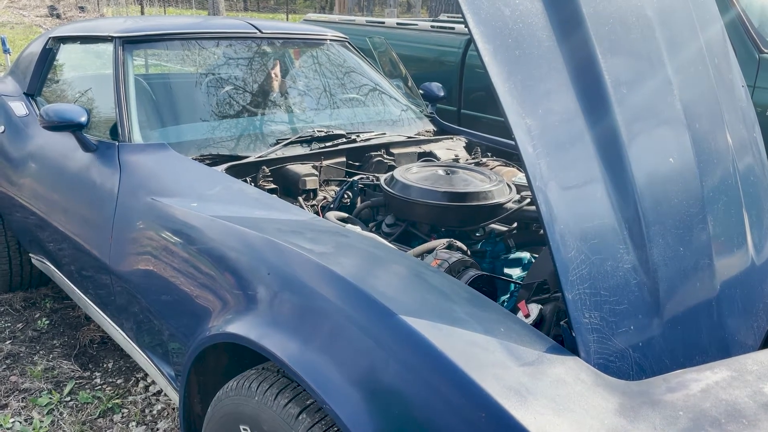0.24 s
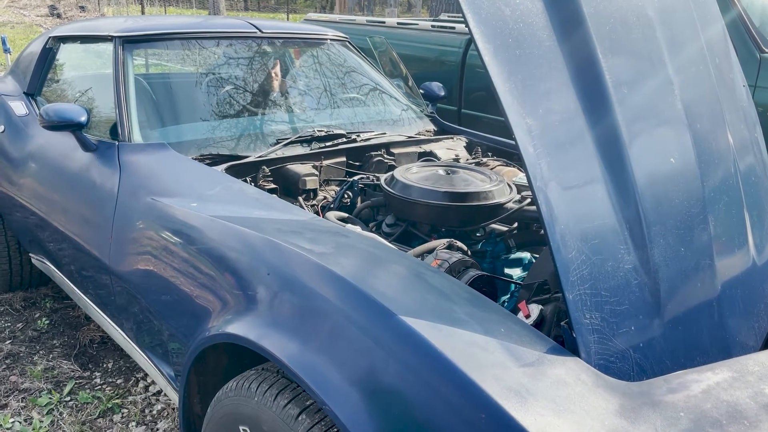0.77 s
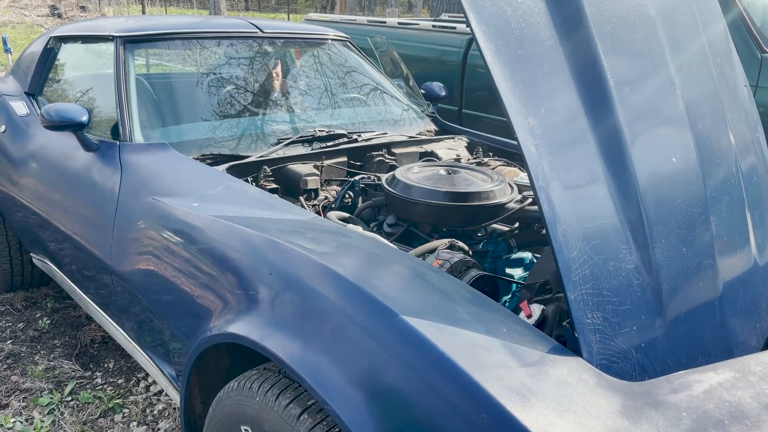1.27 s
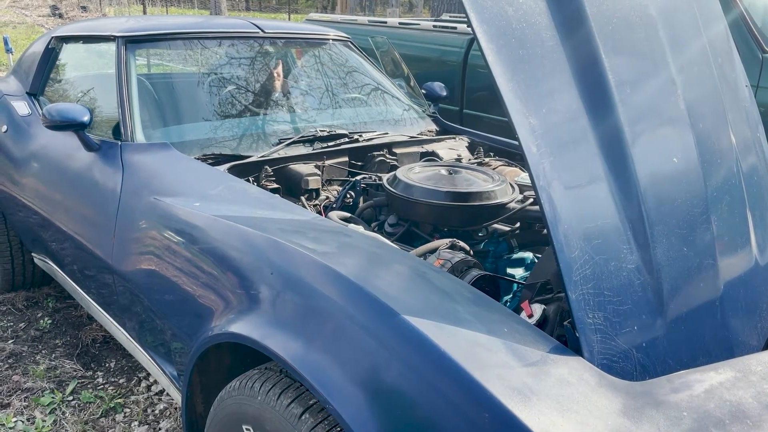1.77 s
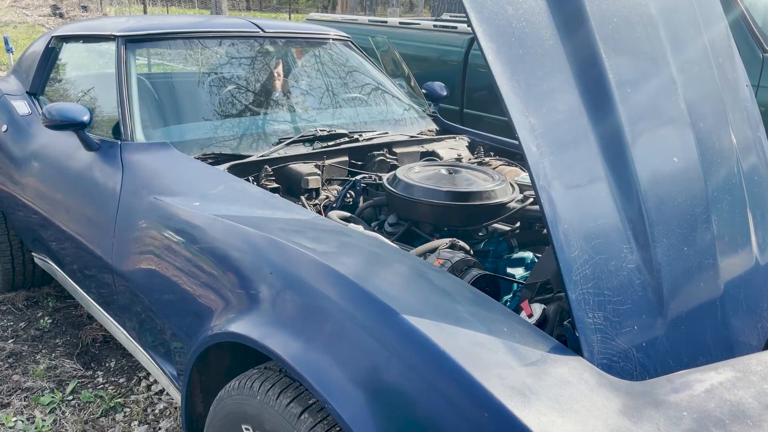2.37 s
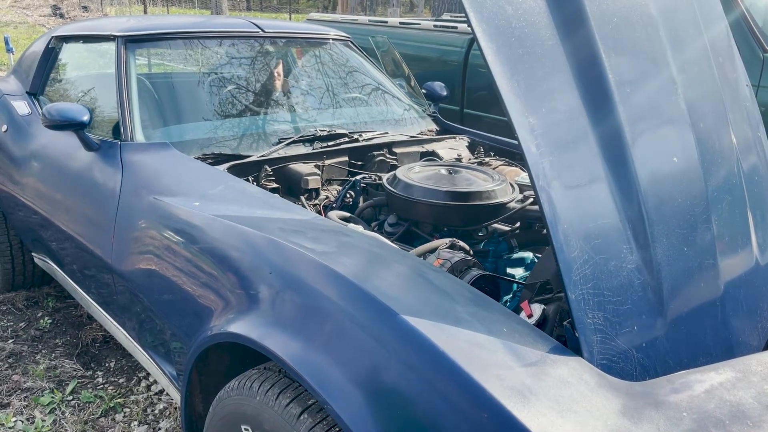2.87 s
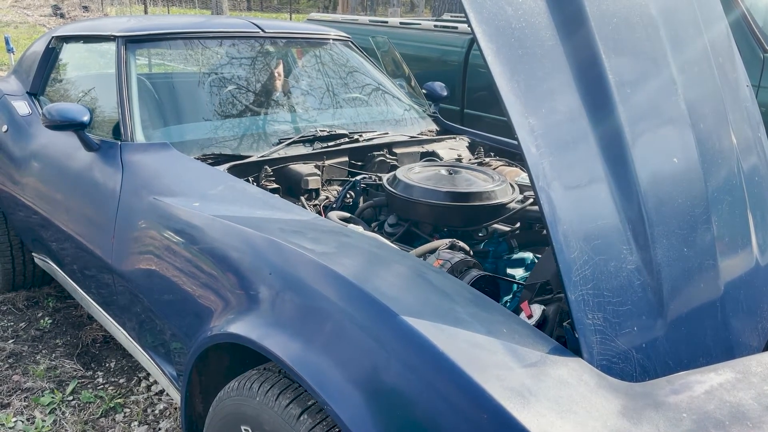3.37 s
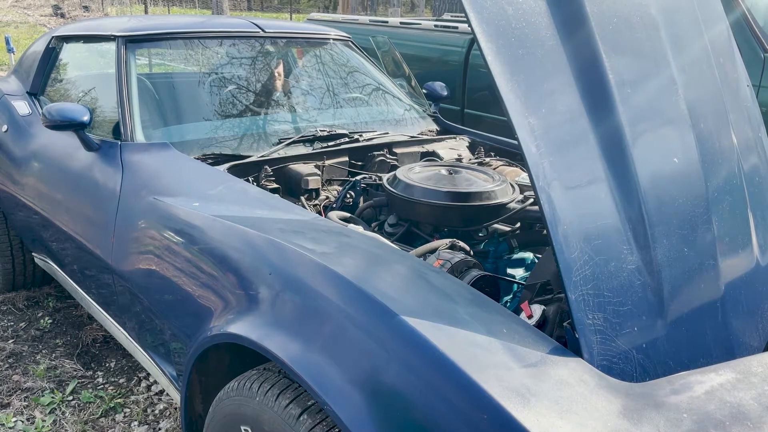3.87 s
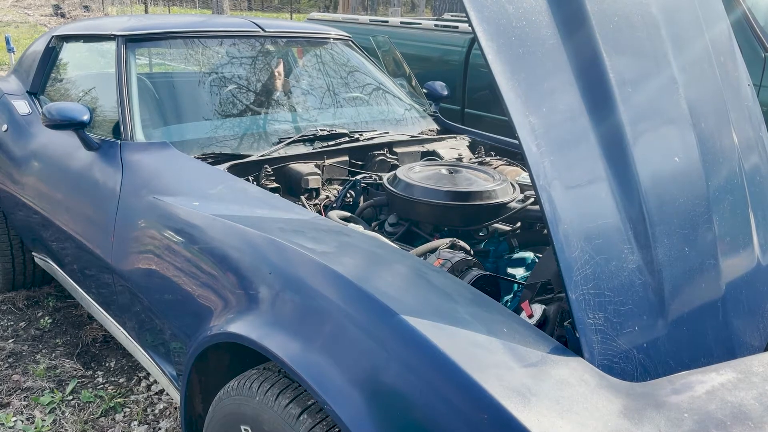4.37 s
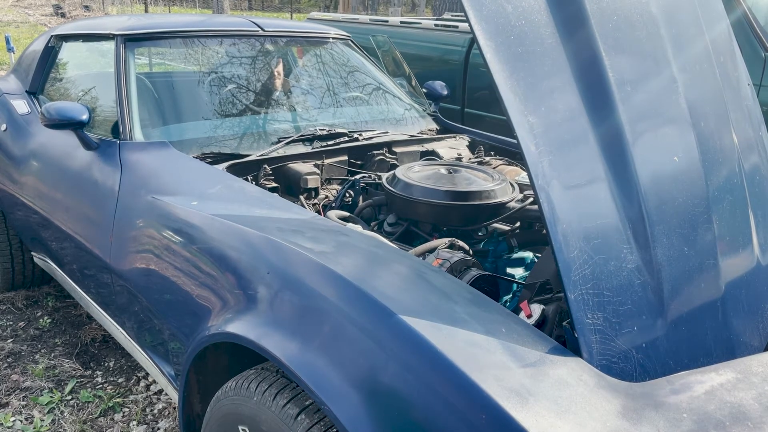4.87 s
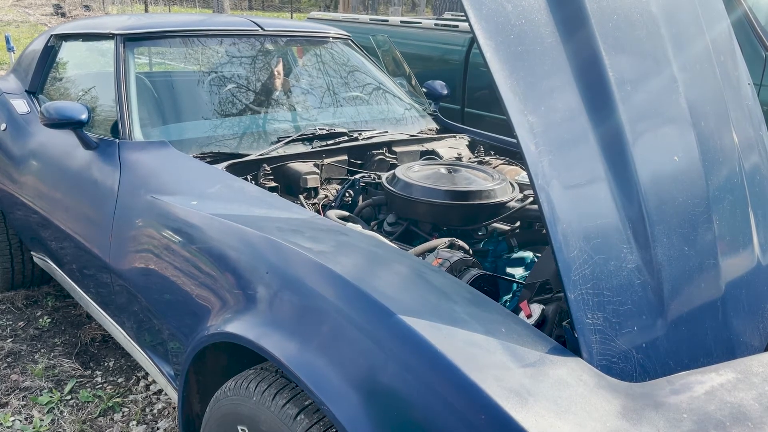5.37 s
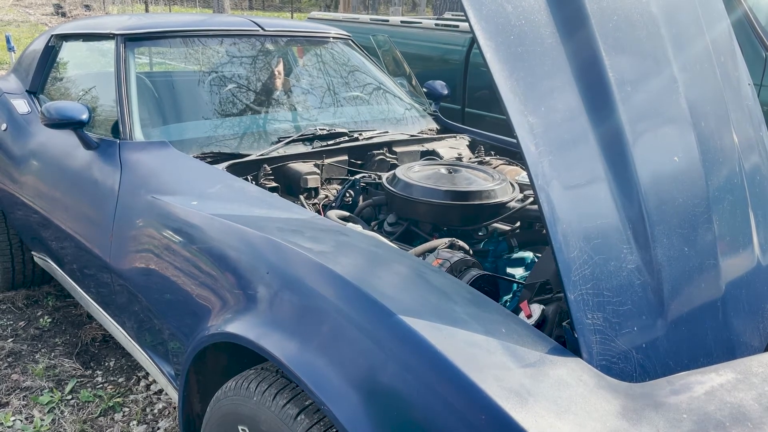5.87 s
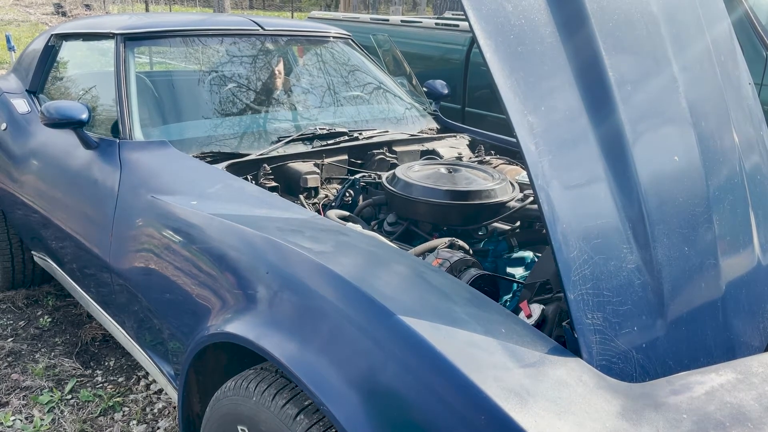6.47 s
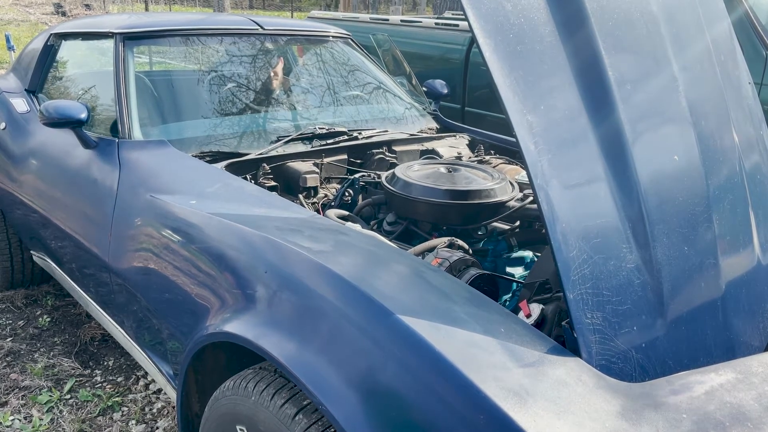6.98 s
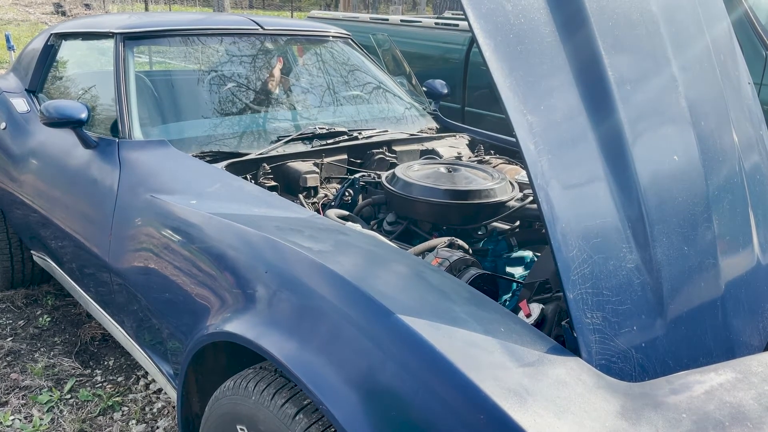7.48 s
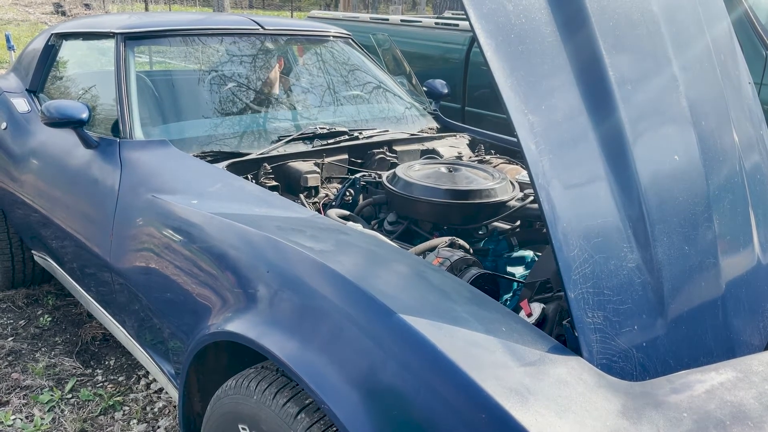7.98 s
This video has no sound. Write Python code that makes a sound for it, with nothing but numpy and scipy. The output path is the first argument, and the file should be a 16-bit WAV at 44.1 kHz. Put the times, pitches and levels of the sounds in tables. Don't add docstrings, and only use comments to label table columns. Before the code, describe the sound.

A large petrol V8 runs about two metres away, hood open, outdoors, heard in stereo on a phone. It starts at a quick idle, sags with uneven misfires, recovers briefly, then slows until it nearly stalls. A rush of intake air follows, then two throttle blips and a steady fast idle. Valve gear knocks and ticks, faint chirps and airy hiss run throughout.

```python
import sys
import numpy as np
from scipy import signal
from scipy.fft import rfft, irfft, next_fast_len
from scipy.io import wavfile
from scipy.ndimage import uniform_filter1d

SR = 44100
rng = np.random.default_rng(int(sys.argv[2]) if len(sys.argv) > 2 else 0)


def convert_level_to_amplitude(level_db):
    exponent = np.asarray(level_db, float) / 20
    return 10 ** exponent


def master(y):
    cut = np.clip(np.atleast_2d(y).T, -1, 1)
    pcm = np.round(cut * 32767)
    wavfile.write(sys.argv[1], SR, pcm.astype(np.int16))


N = 363384
TIME = np.arange(N) / SR
HZ = np.maximum(np.fft.rfftfreq(next_fast_len(N, True), 1 / SR), 1)
SIZE = 2 * len(HZ) - 2
REF_HZ = 64

# (time [s], firing rate [Hz])
SPEED = [(0.0, 65.03), (1.34, 46.83), (2.28, 34.38), (2.79, 49.04), (3.17, 50.98), (4.14, 43.78),
         (4.61, 37.78), (5.12, 33.7), (5.62, 29.72), (5.95, 30.75), (6.28, 26.37), (6.46, 35.13),
         (6.75, 83.5), (7.04, 65.5), (7.44, 105), (7.52, 104), (7.75, 79.5), (8.24, 79.4)]


def unit(x):
    return x / np.sqrt(np.mean(x ** 2))


def curves(rows):
    s, *columns = np.transpose(rows)
    return [np.interp(TIME, s, c) for c in columns]


def walk(rate):
    hold = int(SR / rate)
    steps = np.repeat(rng.standard_normal(N // hold + 1), hold)
    return 0.957 * uniform_filter1d(uniform_filter1d(steps, hold), hold)[:N]


def coloured(gain):
    real, imag = rng.standard_normal((2, 2, len(HZ)))
    return unit(irfft((real + 1j * imag) * gain, SIZE)[:, :N])


def noise(spectrum):
    hz, db = np.transpose(spectrum)
    return coloured(convert_level_to_amplitude(np.interp(np.log(HZ), np.log(hz), db)))


def response(modes):
    total = 0
    for k, (f, width, db) in enumerate(modes):
        total = total + (-1) ** k * convert_level_to_amplitude(db) * 1j * HZ * width / (f * f - HZ ** 2 + 1j * HZ * width)
    return total


def rattle(modes):
    return coloured(response(modes))


def paths(direct, scattered, share):
    share = np.clip(share, 0, 1)
    return np.array([np.sqrt(1 - share) * direct, np.sqrt(share) * scattered])


def bumps(events, rise_s, fall_s):
    s, db = np.transpose(events)
    out = np.zeros(N)
    for t, g in zip(s, convert_level_to_amplitude(db)):
        near = slice(max(int((t - 4 * rise_s) * SR), 0), int((t + 6 * fall_s) * SR))
        d = TIME[near] - t
        rise = np.exp(-(d / rise_s) ** 2)
        fall = np.exp(-np.maximum(d, 0) / fall_s)
        out[near] += g * np.where(d < 0, rise, fall)
    return out


def knocks(events, modes, rise_s, fall_s, db):
    return paths(*rattle(modes), share=0.2) * bumps(events, rise_s, fall_s) * convert_level_to_amplitude(db)


def gaps(rows):
    coarse = TIME[::32]
    total = sum(db * np.exp(-((coarse - s) / (0.58 * length)) ** 4) for s, length, db in rows)
    return np.interp(TIME, coarse, total)


def speed():
    full_pull_per_s, slew_s, lead_s = .78, .08, .03
    hz = curves(SPEED)[0]
    pull = uniform_filter1d(np.gradient(np.log(hz)) * SR, int(slew_s * SR))
    pull = np.interp(TIME + lead_s, TIME, pull)
    return hz, np.cumsum(hz) / SR, np.tanh((pull / full_pull_per_s) ** 3)


def law_db(base_db, doubling_db, open_db, overrun_db):
    hz, _, throttle = speed()
    by_speed = base_db + doubling_db * np.log2(hz / REF_HZ)
    return by_speed + open_db * np.maximum(throttle, 0) + overrun_db * np.maximum(-throttle, 0)


def cam(pattern, count, scatter_db, slow_db):
    hz, fired, _ = speed()
    share, db = np.transpose(pattern)
    turns = np.arange(count)[:, None] + share
    s = np.interp(turns.ravel() * 8, fired, TIME)
    chance = np.clip(rng.standard_normal((count, len(db))), -2, 1)
    slowness = np.log2(REF_HZ / np.interp(s, TIME, hz))
    return list(zip(s, (db + scatter_db * chance).ravel() + slow_db * slowness))


def firings(jitter=0.013):
    cylinder_bias = [-.5, -.5, 0, 0, 0, 1, 1, -1]
    scatter_db, slow_power, overrun_skip_db = 1.6, 1.1, -7
    hz, turns, throttle = speed()
    rough_db = scatter_db * (REF_HZ / hz) ** slow_power * (1 - np.maximum(throttle, 0) / 2)
    count = np.arange(int(turns[-1]))
    chance = np.clip(rng.standard_normal((1000, 2))[count], -2, 1)
    late = jitter * np.interp(count, turns, rough_db) * chance[:, 0]
    at = np.searchsorted(turns, count + late)
    strength_db = rough_db[at] * (np.array(cylinder_bias)[count % 8] / 2 + chance[:, 1])
    skip_db = overrun_skip_db * (count % 2) * np.maximum(-throttle[at], 0) ** 2
    pulses, even = np.zeros(N), np.zeros(N)
    pulses[at] = convert_level_to_amplitude(strength_db + skip_db)
    even[at] = 1
    return pulses, even, turns % 1


def misfire_db():
    # (time [s], length [s], change [dB])
    failures = [(1.091, .021, -5), (1.134, 0.012, -11), (1.19, 0.02, -5), (1.34, 0.012, -17),
                (1.469, 0.012, -24), (1.61, 0.023, -17), (1.785, 0.043, -9.5), (1.841, .036, -5.5),
                (2.038, 0.097, -5.5), (2.226, 0.15, -6.5), (2.279, 0.052, -4), (2.343, 0.052, -5.5),
                (2.8, .02, 4), (3.12, 0.028, 2), (3.44, 0.03, 4.5), (3.87, 0.029, -4.5), (3.955, 0.021, 0),
                (4.61, 0.022, -5), (5.047, 0.049, -4.5), (5.211, 0.13, -3.5), (5.339, 0.05, -3.5),
                (5.431, 0.023, 0), (5.521, 0.034, -4), (5.682, .087, -5.5), (5.97, .056, -2),
                (6.085, 0.089, -7), (6.418, 0.08, -6), (6.877, 0.049, -3.5), (7.128, .028, -3),
                (7.474, .028, -4)]
    lame_from_s, lame_width_turns = .6, 0.13
    lame = cam([(0.854, -6)], count=33, scatter_db=6.5, slow_db=-1.5)
    weak = []
    for s, db in lame:
        if s > lame_from_s:
            turn_s = 8 / np.interp(s, *np.transpose(SPEED))
            weak.append((s, lame_width_turns * turn_s, min(db, 0)))
    return gaps(failures + weak)


def rung(pulses, even, gain):
    pulses, even = irfft(rfft(np.array([pulses, even]), SIZE) * gain, SIZE)[:, :N]
    return pulses / np.sqrt(uniform_filter1d(even ** 2, size=6000))


def exhaust(pulses, even, weak_db, gas_db):
    # (time [s], level [dB])
    thump = [(0, -19.5), (1.8, -17), (2.1, -17), (2.4, -14.5), (3.0, -18.5), (4.5, -18), (4.85, -23.5),
             (5.4, -22.5), (5.7, -28.5), (6.4, -29.5), (6.46, -15.5), (6.6, -12.5), (6.9, -16),
             (7.0, -23.5), (7.1, -15), (7.34, -12), (7.46, -16.5), (8.24, -18)]
    # (frequency [Hz], width [Hz], level [dB])
    pipe = [(36.7, 15, 2.5), (84.1, 25.3, 5)]
    # (frequency [Hz], width [Hz], level [dB])
    chamber = [(57.4, 120, 0)]
    # (frequency [Hz], width [Hz], level [dB])
    header_modes = [(154, 22, -4), (215.7, 7, 2), (302.2, 12.4, 2), (358.6, 10.7, -3.5), (479, 11, -5.5),
                    (626, 39, -12)]
    note = rung(pulses, even, response(pipe) * response(chamber) ** 2)
    note = note * convert_level_to_amplitude(curves(thump)[0] + 1.72 * weak_db)
    uneven = convert_level_to_amplitude(4 * np.clip(rng.standard_normal(N), -2, 1.5))
    bark = rung(pulses * uneven, even, response(header_modes)) * convert_level_to_amplitude(gas_db + .5 * weak_db - 6.0)
    deep = paths(note, np.roll(note, 900) * walk(21), share=.012)
    return deep + paths(bark, np.roll(bark, 900) * walk(25), share=0.012)


def roar(phase, weak_db, db):
    # (frequency [Hz], level [dB per Hz])
    gas_spectrum = [(71, -9), (120, -1.5), (180, -7), (214, -1.5), (255, -8), (305, -1), (396, -10.5),
                    (583, -6), (1160, -19), (1770, -27), (2000, -22), (5070, -35.5), (8000, -89),
                    (10400, -73), (17600, -120)]
    # (frequency [Hz], width [Hz], level [dB])
    shields = [(1310, 300, -2.5), (1756, 76, 5.5), (2300, 36, -7)]
    puff = unit(1.24 + np.exp(-phase / 0.11)) * convert_level_to_amplitude(db + 0.091 * weak_db + 1.44 * walk(12) + 2.0)
    gas = noise(gas_spectrum) + convert_level_to_amplitude(-14.5) * rattle(shields)
    return paths(*gas, share=0.084) * puff


def gear(db):
    # (frequency [Hz], level [dB per Hz])
    belt_spectrum = [(71, -6), (120, 1), (151, -1.5), (269, -17), (489, -15), (746, -17), (1010, -18),
                     (1140, -19), (1510, -22.5), (3320, -29), (8000, -37.5), (10400, -29.5), (17600, -120)]
    # (frequency [Hz], width [Hz], level [dB])
    block = [(1018, 53, 7.5), (1325, 75, 2), (1762, 39, 0.5), (2680, 520, -8.5)]
    # (time [s], level [dB])
    single_knocks = [(.137, -27), (1.981, -31), (2.203, -29.5), (2.283, -33), (4.272, -35), (4.474, -35),
                     (4.706, -34), (4.893, -38), (5.157, -42), (5.247, -34), (5.415, -37), (5.669, -46),
                     (5.737, -40), (5.77, -35), (5.95, -34), (6.024, -48), (6.06, -30), (6.25, -25),
                     (6.355, -42), (6.39, -33), (6.499, -18)]
    # (position [share of the turn], level [dB])
    cam_knocks = [
        (.13, -39),
        (.64, -37),
        (.78, -35),
        (.97, -39),
    ]
    # (frequency [Hz], width [Hz], level [dB])
    clatter = [(1024, 140, 6.5), (1420, 200, 0.5), (1740, 180, 2.5), (2510, 800, -9.5)]
    broad = paths(*noise(belt_spectrum), share=0.13) * convert_level_to_amplitude(db + 1.3 * walk(9) + 5.0)
    ring = paths(*rattle(block), share=.09) * convert_level_to_amplitude(db + 2.7 * walk(35) - 6.0)
    hits = single_knocks + cam(cam_knocks, count=33, scatter_db=5.5, slow_db=3.0)
    return broad + ring + knocks(hits, clatter, 0.0059, 0.008, db=-5.5)


def intake():
    # (time [s], length [s], change [dB])
    chokes = [
        (.1, .1, -3.5),
        (2.05, 0.19, -3.5),
        (2.45, .2, 1),
        (6.16, 0.18, -13.5),
        (6.4, 0.14, -9),
        (6.62, 0.12, 1),
    ]
    # (time [s], level [dB])
    gulps = [
        (6.117, -31),
        (6.1544, -33),
        (6.1891, -29),
        (6.2409, -36),
        (6.4034, -26),
        (6.4642, -34),
        (6.5242, -30),
        (6.5444, -42),
        (6.564, -19.5),
    ]
    # (frequency [Hz], level [dB per Hz])
    hiss = [(2500, -0.5), (4000, -2.5), (5600, -7), (6700, 3.5), (8000, 4), (9300, 13.5), (10700, 3),
            (11400, 1.5), (13200, 8), (14500, -0.5), (15700, 2), (16100, -40)]
    # (frequency [Hz], width [Hz], level [dB])
    whistle = [(10750, 450, 2), (11900, 80, 1), (12200, 60, 1), (12520, 60, 1), (13230, 250, 0),
               (14300, 500, 0)]
    suction_db = law_db(-40.5, doubling_db=1.5, open_db=.9, overrun_db=0)
    drift_db = .8 * walk(9.2) + 1.7 * walk(30)
    flow = convert_level_to_amplitude(suction_db + gaps(chokes) + drift_db + 1.5)
    flow = flow + bumps(gulps, 0.0019, 0.01) * convert_level_to_amplitude(-9.5)
    air = noise(hiss) + convert_level_to_amplitude(-3.0) * rattle(whistle)
    return paths(*unit(air), share=0.028) * flow


def leak():
    # (position [share of the turn], level [dB])
    cam_chirps = [
        (.03, -46.5),
        (.16, -46),
    ]
    phase = 2 * np.pi * np.cumsum(1493 * (1 + 0.00813 * walk(30))) / SR
    chirps = cam(cam_chirps, count=49, scatter_db=3.0, slow_db=-3.0)
    tone = paths(np.sin(phase), np.cos(phase) * walk(20), share=.07)
    return tone * bumps(chirps, rise_s=.006, fall_s=.008) * convert_level_to_amplitude(10.5)


def tappets():
    # (position [share of the turn], level [dB])
    cam_ticks = [
        (.19, -45),
        (.58, -49.5),
        (.96, -45),
    ]
    # (time [s], level [dB])
    single_ticks = [(1.141, -44), (1.479, -40.5), (2.068, -40.5), (2.328, -42), (2.375, -43), (2.502, -40),
                    (2.641, -48), (2.687, -47), (4.793, -48), (4.964, -49), (5.717, -48), (5.893, -50),
                    (6.053, -47), (6.194, -43.5), (6.245, -43)]
    # (frequency [Hz], width [Hz], level [dB])
    tappet_modes = [(2720, 530, 2), (3750, 210, 6.5), (4520, 1660, 0.5), (5450, 210, -6)]
    ticks = single_ticks + cam(cam_ticks, count=33, scatter_db=3.0, slow_db=-3)
    return knocks(ticks, tappet_modes, 0.0041, 0.013, db=2.5)


def rush():
    # (time [s], level [dB])
    gusts = [
        (6.47, -39.5),
        (6.53, -37),
        (6.57, -31.5),
        (6.62, -37),
        (6.67, -36.5),
    ]
    # (frequency [Hz], width [Hz], level [dB])
    throat = [(4230, 9100, 0)]
    return knocks(gusts, throat, 0.014, 0.033, db=2.5)


def ports(direct, scattered):
    # (frequency [Hz], lead [rad], balance [dB])
    port_bend = [(0, .04, -1.1), (300, .06, -1), (700, .1, 0), (1500, .15, -.2), (2900, .9, 1),
                 (4500, .4, 1.5), (5400, .3, 1.4), (6600, -1.1, .8), (7800, -2.3, .5), (8550, -3.05, .3),
                 (9050, -3.2, 0), (9900, -4, 0), (12300, -5.6, 0), (13200, -6.2, 0), (15400, -6.3, 0)]
    hz, lead, db = np.transpose(port_bend)
    half = convert_level_to_amplitude(np.interp(HZ, hz, db) / 2) * np.exp(.5j * np.interp(HZ, hz, lead))
    left, right = irfft(rfft(direct, SIZE) * np.array([half, 1 / half]), SIZE)[:, :N]
    return np.array([left + scattered, right - scattered])


def scene():
    pulses, even, phase = firings()
    weak_db = misfire_db()
    gas_db = law_db(-30, doubling_db=16.5, open_db=0.1, overrun_db=-1)
    gear_db = law_db(-34, doubling_db=7.5, open_db=2.5, overrun_db=0.5)
    bay = exhaust(pulses, even, weak_db, gas_db) + roar(phase, weak_db, gas_db) + gear(gear_db)
    bay = bay + intake() + leak() + tappets() + rush()
    return ports(*bay)


def top_cut(x):
    return signal.sosfilt(signal.butter(12, 15840, fs=SR, output="sos"), x)


def record(dry):
    bass_cut = signal.sosfilt(signal.butter(2, 32.0, "high", fs=SR, output="sos"), dry)
    rounded = bass_cut / (1 + (bass_cut / .85) ** 4) ** .25
    return top_cut(rounded)


dry = scene()
out = record(dry)
master(out)
```